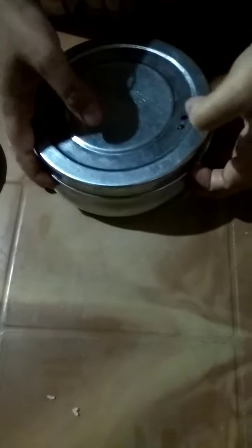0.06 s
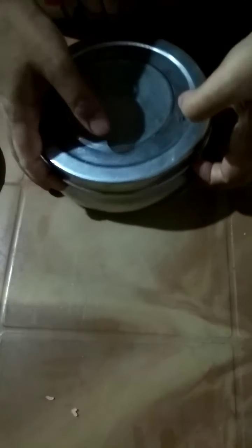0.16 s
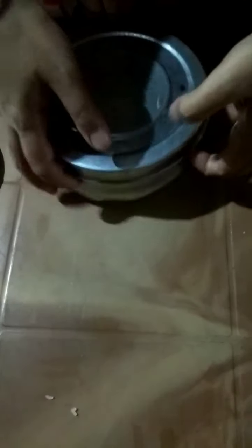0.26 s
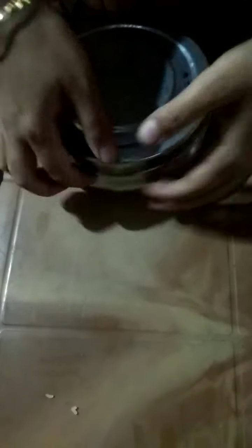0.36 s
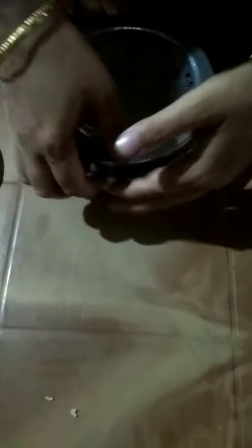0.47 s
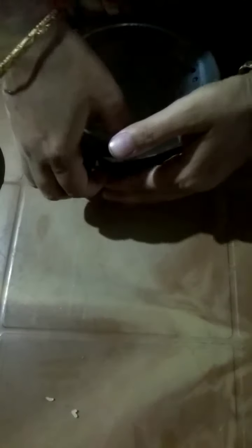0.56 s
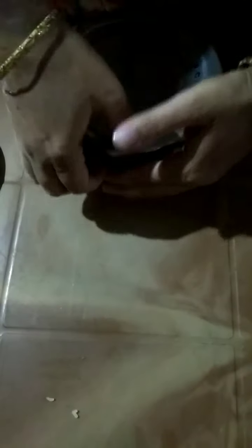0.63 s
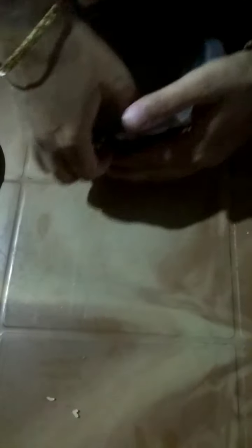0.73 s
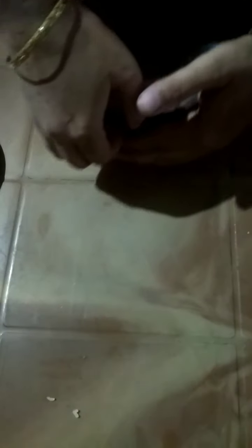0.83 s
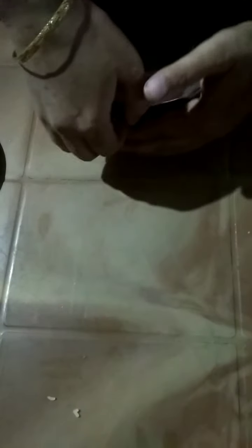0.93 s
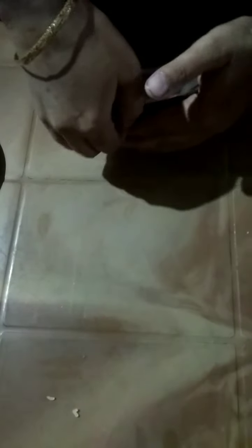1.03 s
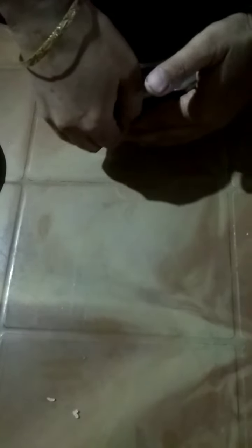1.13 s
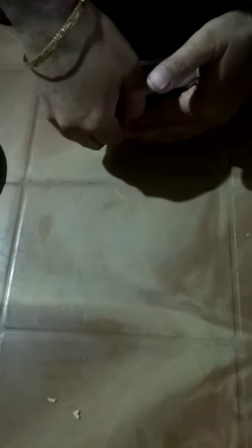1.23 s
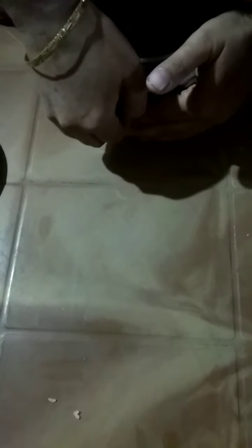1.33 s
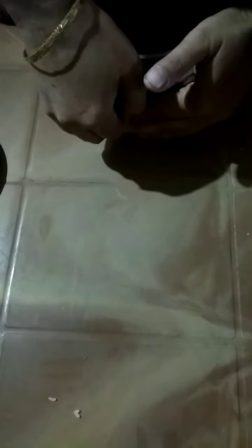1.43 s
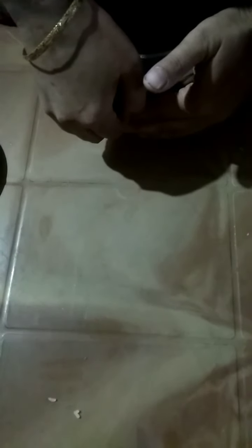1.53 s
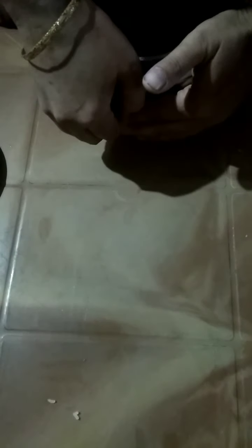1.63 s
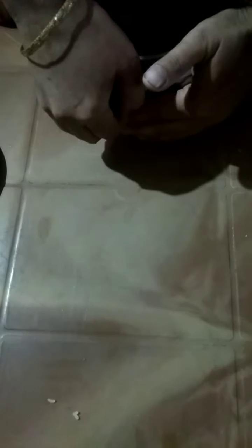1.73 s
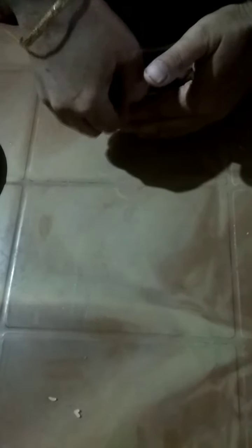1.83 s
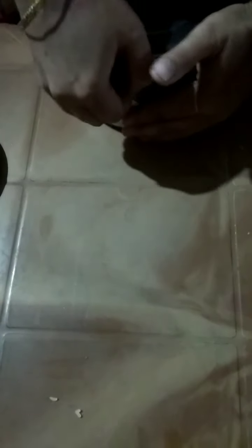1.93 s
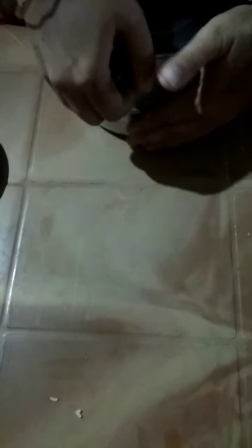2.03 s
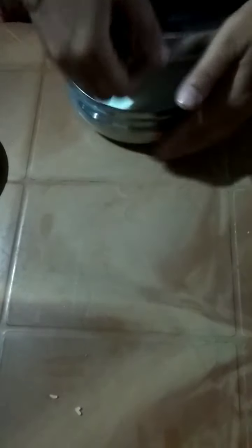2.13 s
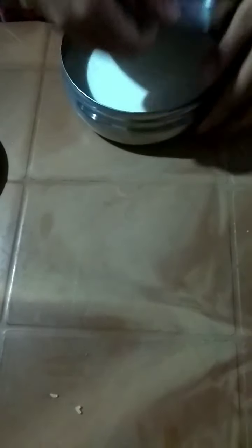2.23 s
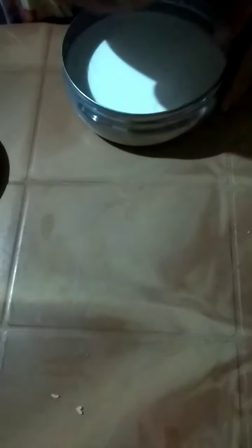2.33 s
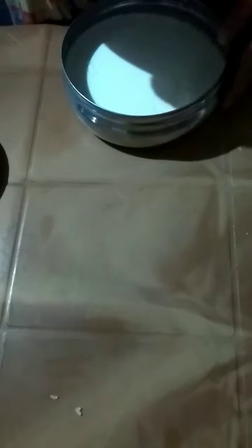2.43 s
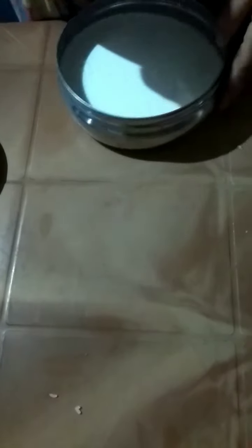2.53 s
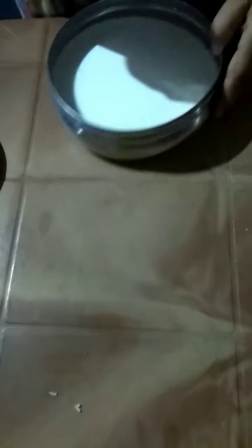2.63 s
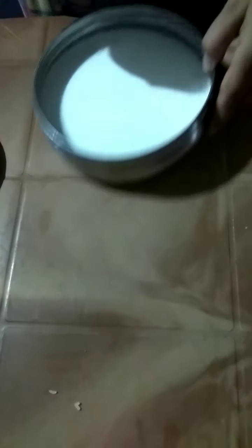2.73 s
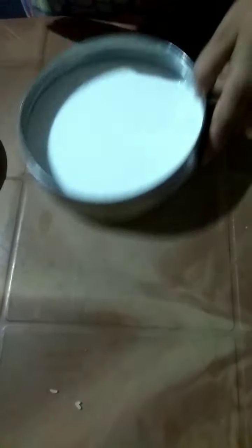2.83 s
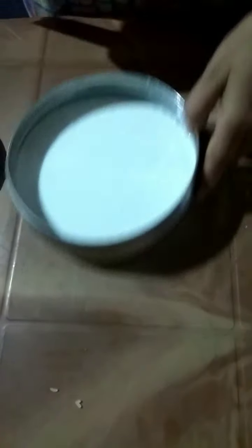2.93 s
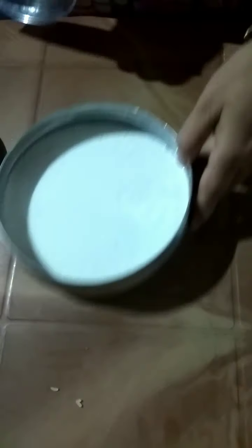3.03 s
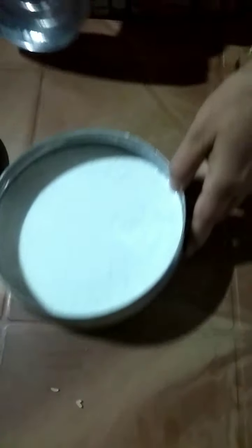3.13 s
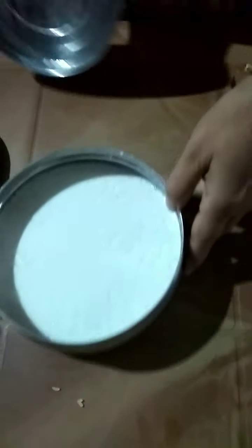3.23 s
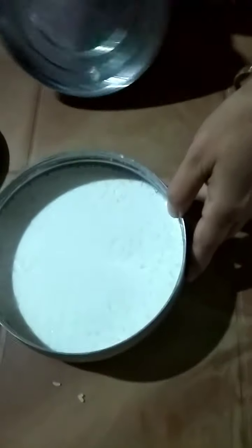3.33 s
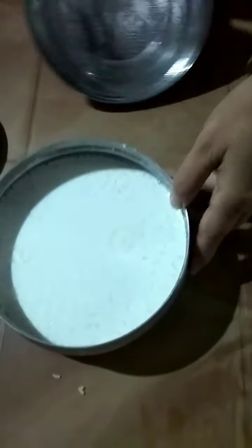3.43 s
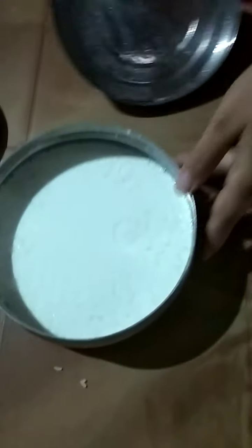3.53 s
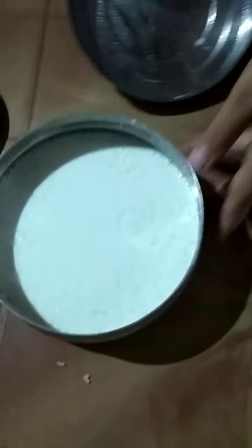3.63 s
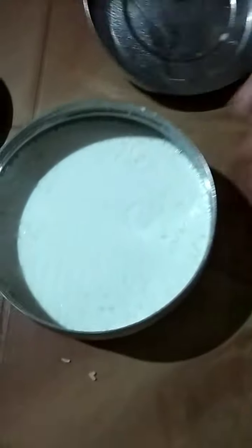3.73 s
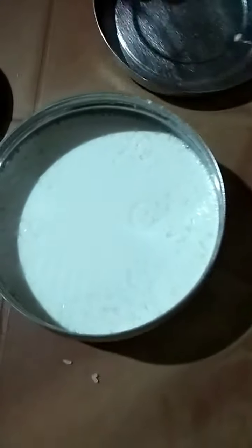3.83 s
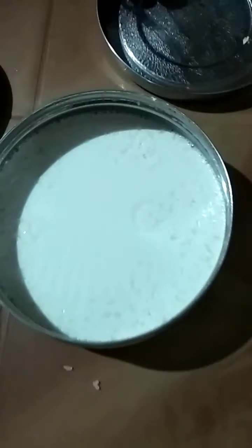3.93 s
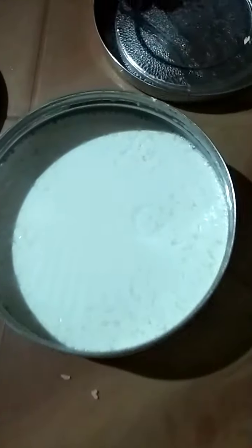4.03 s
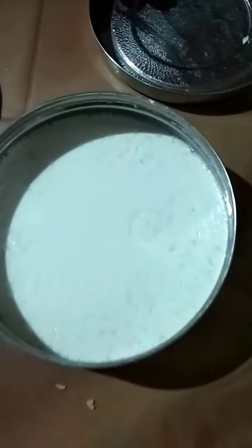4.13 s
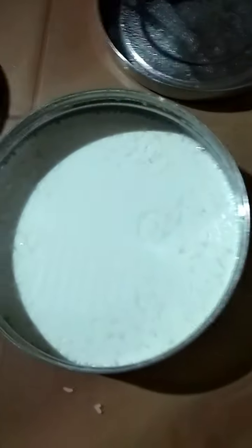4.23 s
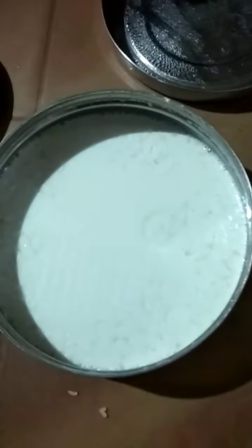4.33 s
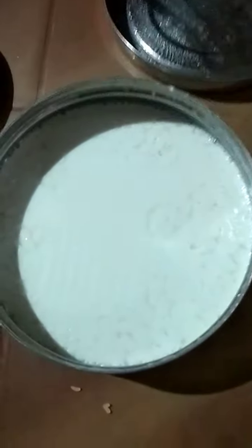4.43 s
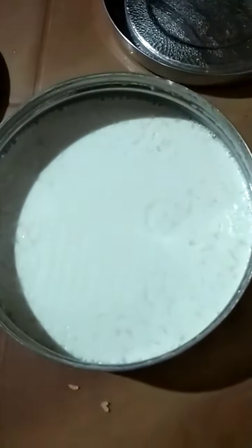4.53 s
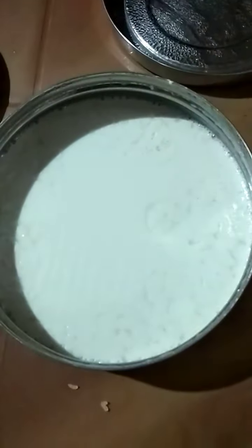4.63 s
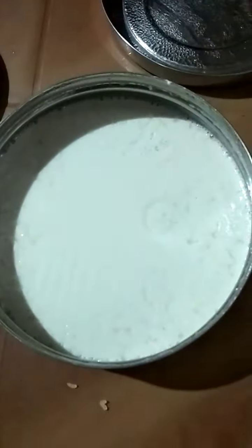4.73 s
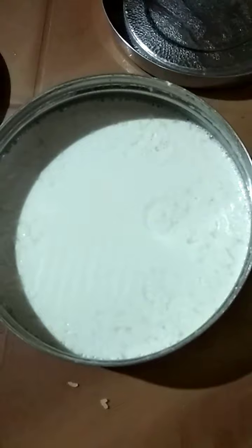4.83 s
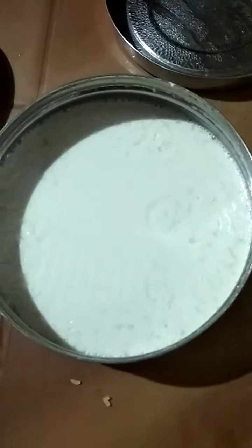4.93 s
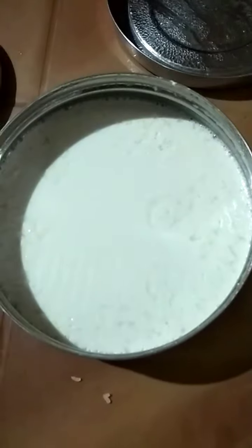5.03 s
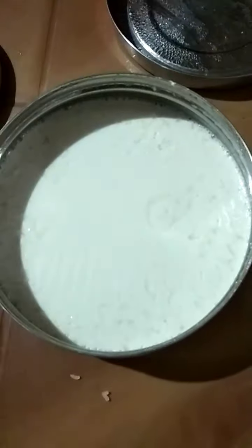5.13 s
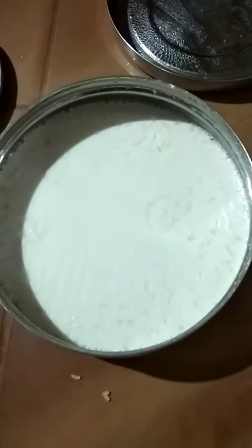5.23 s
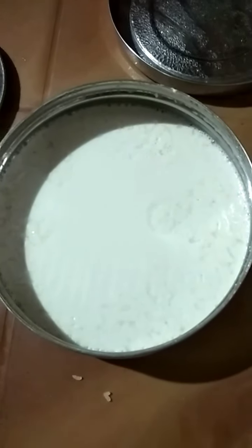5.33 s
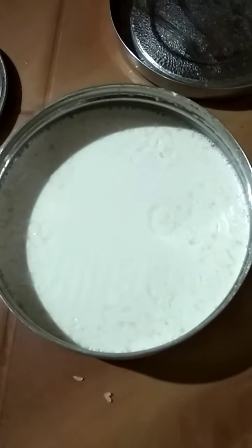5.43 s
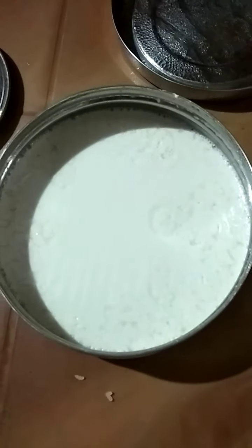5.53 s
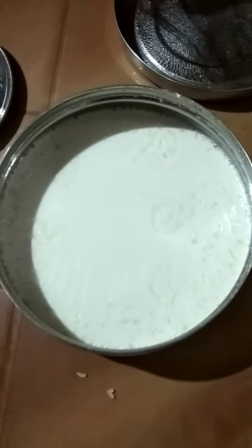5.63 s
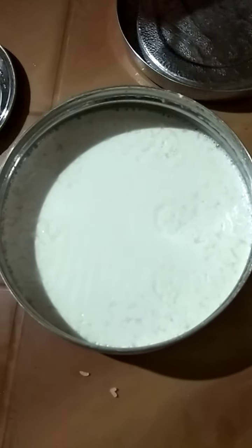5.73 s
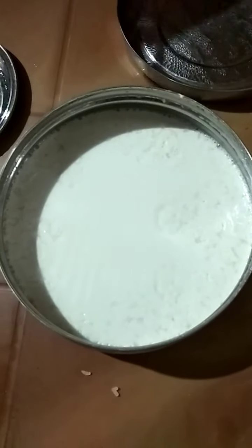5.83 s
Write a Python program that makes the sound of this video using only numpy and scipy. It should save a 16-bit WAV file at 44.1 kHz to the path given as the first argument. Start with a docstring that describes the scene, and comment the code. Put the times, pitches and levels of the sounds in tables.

```python
"""A steady hiss over a low house rumble, then dull bumps: a round steel food tin on a tiled kitchen floor.
The phone's two microphones are close. Fingers and palm rub shaped noise; pushes set the hollow tin booming.
The lid snaps free as a short stick-slip scrape and rings in many decaying steel modes; the tin is shoved,
the lid is put down and rattles to rest, and a bangle clinks twice in beating modes.
A small hard room answers the knocks and scrapes with a short tail of decaying noise."""
import sys
import numpy as np
from scipy import signal
from scipy.fft import rfft, irfft, next_fast_len
from scipy.io import wavfile
from scipy.ndimage import uniform_filter1d, map_coordinates

SR = 44100
rng = np.random.default_rng(int(sys.argv[2]) if len(sys.argv) > 2 else 0)


def master(y):
    """Save y as 16-bit WAV."""
    cut = np.clip(np.atleast_2d(y).T, -1, 1)
    pcm = np.round(cut * 32767)  # scale
    wavfile.write(sys.argv[1], SR, pcm.astype(np.int16))


N = 259562  # length of the scene in samples
T = np.arange(SR // 2) / SR  # seconds since a blow

# Likeness of the left and right microphones. Each row: frequency in Hz, likeness from 0 to 1.
MIC_LIKENESS = [(200, 0.97), (350, 0.92), (600, 0.17), (1000, 0), (16000, 0.042)]
# Decay of the tiled room. Each row: frequency in Hz, t60 in seconds.
ROOM_DECAY = [(150, 0.38), (1000, 0.36), (3000, 0.52), (8000, 0.41), (15000, 0.28)]
TOP_HZ = 15900  # band limit of the phone

# Hiss at the microphones. Each row: frequency in Hz, relative level in dB per Hz.
HISS_SPECTRUM = [(500, -28), (1500, -11.5), (3000, -12), (4300, -12.5), (5300, -0.5), (6900, 3),
                 (8700, -3.5), (10400, 6), (12200, -6), (14000, 1.5), (15300, -15), (16000, -1)]
# Low rumble of the house. Each row: frequency in Hz, relative level in dB per Hz.
RUMBLE_SPECTRUM = [(12, -8), (24, 11.5), (50, -10), (90, -4.5), (140, -18), (205, -7), (400, -22),
                   (900, -22.5), (2000, -54), (5000, -25.5)]
WHISTLE_DB = -69  # a thin whistle in the hiss

# The tin is shoved over the tile. Each row: start in seconds, hold in seconds, level in dB.
TIN_DRAGS = [(.15, 0.12, -57), (.35, 1, -63), (1.91, 0.027, -37.5), (2.15, 0.17, -48.5),
             (2.555, 0.023, -48.5), (2.83, 0.1, -47.5), (2.99, 0.38, -52.5), (3.64, 0.25, -59),
             (4.115, 0.008, -52)]
DRAG_ATTACK_S, DRAG_RELEASE_S = 0.037, 0.022  # time constants of a shove
# Steel grinding over tile. Each row: frequency in Hz, relative level in dB per Hz.
GRIND_SPECTRUM = [(25, 12), (60, 0.5), (110, -4), (150, 4.5), (220, -7), (330, -1.5), (480, -8.5),
                  (900, -8), (2000, -16.5), (4000, -25), (15000, -31.5)]
# A shoved tin sticks and slips: mean slips a second, level beside the grinding.
JUDDER_PER_S, JUDDER_DB = 64, -2
# The tin's base scuffs the tile.
# Each row: centre in seconds, level in dB, half-length in seconds, brightness in dB per octave.
BASE_SCUFFS = [(0.207, -48.5, 0.034, 2.5), (2.615, -35, 0.0081, -3), (2.885, -41.5, 0.031, -11),
               (3.036, -39.5, 0.012, 4), (3.186, -67, 0.061, -8.5)]
# Steel scuffing on tile. Each row: frequency in Hz, relative level in dB per Hz.
SCUFF_SPECTRUM = [(150, 1.5), (330, 2), (550, 1.5), (850, -3), (1500, -11.5), (2800, -17), (15000, -22)]
UNEVENNESS_DB, UNEVENNESS_PER_S = 0, 260  # scuff unevenness, 0 for even; its random knots a second
# Fingers slide over the steel. Each row: start in seconds, hold in seconds, level in dB.
FINGER_RUBS = [(.28, 0.044, -50), (.77, 0.16, -50), (1.125, 0.02, -51), (1.92, 0.0099, -45.5),
               (2.19, 0.049, -38), (2.66, 0.19, -47), (2.92, 0.17, -46.5), (3.1, 0.17, -49),
               (3.6, 0.29, -60)]
RUB_ATTACK_S, RUB_RELEASE_S = 0.028, 0.045  # time constants of a finger stroke
# Fingertips on steel. Each row: frequency in Hz, relative level in dB per Hz.
SKIN_SPECTRUM = [(300, -4), (550, 7.5), (1000, 1.5), (2500, 3), (4500, 4), (8000, 4), (12000, 10.5),
                 (15500, -3)]
SCRATCH_DB = -21.5  # the part of a finger stroke that drums on the hollow tin

# Soft blows of the tin on fingers and floor.
# Each row: time in seconds, push in dB, push half-width in seconds, boom against the push in dB.
TIN_BUMPS = [(.160, -24, 0.0015, -10), (.169, -44, 0.00062, -29), (.189, -48, 0.0014, -13),
             (.198, -40.5, 0.0014, -16), (.224, -56, 0.0016, -1), (.357, -48, .0005, -14),
             (.637, -40, 0.0006, -14), (.915, -47, 0.0003, -22), (1.471, -32.5, 0.0011, -14),
             (1.537, -34.5, 0.00091, -26), (1.582, -29, 0.0012, -14.5), (1.687, -28, 0.0012, -10),
             (1.717, -41.5, 0.0016, -7), (1.785, -32.5, 0.00096, -10.5), (1.96, -39, 0.014, -5),
             (2.187, -22.5, 0.00065, -13), (2.553, -49, 0.00067, -6), (2.612, -39, 0.0006, -8),
             (2.642, -43, 0.0016, -2.5), (2.877, -42, 0.0021, -5), (2.913, -33, 0.0014, -11.5),
             (3.047, -29.5, 0.0025, -11.5), (3.086, -32.5, 0.0024, -20), (3.296, -36, 0.0017, -12),
             (4.107, -33, 0.00059, -17), (4.117, -36.5, 0.00061, -19), (4.913, -39.5, 0.0009, -14)]
# The hollow tin on the floor. Each row: frequency in Hz, level in dB, t60 in seconds before other damping.
HOLLOW_TIN = [(145.4, 0, 0.48), (176.2, -2.5, 0.24), (267.5, -2.5, 0.07), (320.5, 3.5, 0.12),
              (1803, -25.5, 0.32)]
# Steel clattering under a blow. Each row: frequency in Hz, relative level in dB per Hz.
CLATTER_SPECTRUM = [(150, -6), (330, 0.5), (450, -12), (600, 3), (900, -1), (1500, -8.5), (2800, -17.5),
                    (4500, -16), (15000, -22.5)]
TIN_CLATTER_DB, LID_CLATTER_DB = -20, -9.5  # clatter under a push of 1 ms half-width
HARDNESS_DB = 9.5  # more clatter for each halving of the contact time

# The tight lid or the base jerks under the grip. Each row: time in seconds, level in dB.
GRIP_SLIPS = [(0.185, -43.5), (0.201, -37.5), (0.211, -47), (0.229, -47.5), (1.137, -52), (1.472, -53.5),
              (1.585, -54), (1.688, -51.5), (1.875, -51), (3.09, -42.5), (3.255, -47.5)]
# Steel damped by the hands. Each row: frequency in Hz, level in dB, t60 in seconds.
GRIPPED_STEEL = [(1115, -0.5, 0.02), (1270, -12.5, 0.053), (2230, -10.5, 0.066), (2430, -15.5, 0.066),
                 (4020, -14, 0.027)]

# The palm drags dully round the lid's wall. Each row: start in seconds, hold in seconds, level in dB.
PALM_TWISTS = [(.33, .13, -60.5), (.58, .025, -59.5), (.69, 0.048, -55.5), (.8, 0.15, -63),
               (1.11, .09, -59), (1.27, 0.19, -64), (1.69, 0.14, -65.5), (1.86, 0.088, -54.5),
               (2.04, 0.049, -60), (2.72, .06, -54.5)]
# Palm on steel. Each row: frequency in Hz, relative level in dB per Hz.
PALM_SPECTRUM = [(200, -4.5), (600, 8.5), (1200, -3), (2400, -2.5), (3600, -8), (6000, -9.5),
                 (15000, -24.5)]
PALM_CATCH_DB, PALM_CATCH_PER_S = 2.5, 70  # how hard and how often the skin catches

# The lid's rim catches the tin. Each row: start in seconds, level in dB, scrape length in seconds,
# ring in dB, brightness in dB per octave, rim resonance in Hz, its half-width in Hz, its lift in dB.
LID_SNAPS = [(2.1854, -14, 0.0099, -7.5, 0, 3590, 230, 21.5),
             (2.371, -33, 0.012, -14.5, 3.5, 2650, 800, 18)]
# The rim's scrape before its resonance. Each row: frequency in Hz, relative level in dB per Hz.
RIM_SPECTRUM = [(120, -9), (320, 1), (1000, -6.5), (2300, -7), (2900, -9), (4200, -7), (4700, 3),
                (5400, -26), (6150, 1.5), (6750, -26.5), (7250, 1.5), (7700, -9.5), (10000, -9.5),
                (11200, -0.5), (12900, -7.5), (14200, -11), (15500, -12.5)]
# Steel of tin and lid as they part. Each row: frequency in Hz, level in dB, t60 in seconds before the grip.
PARTING_STEEL = [(238, -6, 0.35), (322, 13, .085), (480, -2, .2), (754, 7, 0.2), (781, -4, .33),
                 (862, -1.5, 0.3), (894, -2, .35), (1019, 6, 0.46), (1027, -3, .55), (1252, -2.5, 0.42),
                 (1428, -3.5, 0.35), (1540, -7, .35), (1550, 2, 0.44), (1785, -3, 0.35), (1992, -7, .5),
                 (2089, -6, 0.45), (2183, -5, .36), (2260, -9, .3), (2385, -11, .5), (2503, -6, .35),
                 (2573, -4, 0.48), (2783, -9, .45), (2912, -6, 0.5), (2966, -4, .4), (3133, -5, 0.45),
                 (3273, -7, .28), (3431, 4, .15), (3523, 12, .045), (3628, -6, 0.22), (3817, 4, .12),
                 (4059, -7, .31), (4409, -5, .22), (4619, -8, 0.35), (6158, -5, .28), (6627, -4, .18),
                 (7250, -4, .13), (8592, -2, .14), (8807, -8, .33), (9505, -5, 0.3), (11350, -5, .16),
                 (12640, -7, .21)]
# A crowd of weak steel overtones. Each row: frequency in Hz, relative level of each overtone in dB.
SHIMMER_LEVELS = [(300, -16), (450, -4), (900, -2), (1680, -4), (2200, 2), (3500, -8), (5000, 3.5),
                  (8000, 3), (11500, 5), (15500, -10.5)]
# Decay of those overtones. Each row: frequency in Hz, t60 in seconds before any grip.
SHIMMER_DECAY = [(300, 0.58), (1200, 0.68), (3000, 0.87), (6000, 0.14), (11000, 0.28), (15000, 0.38)]

# The open tin's edge taps the tile. Each row: start in seconds, level in dB, scrape length in seconds,
# ring in dB, brightness in dB per octave, rim resonance in Hz, its half-width in Hz, its lift in dB.
EDGE_TAPS = [(2.6275, -30.5, 0.012, -9, 4.5, 3780, 332, 13.5), (3.03, -37, 0.0043, -21, 5.8, 1280, 501, 31)]
# Steel of the open tin. Each row: frequency in Hz, level in dB, t60 in seconds before the grip.
OPEN_TIN_STEEL = [(624, 0, .33), (992, 1, .35), (1007, 5.5, 0.42), (1535, 0, 0.33), (1968, 5, 0.3),
                  (1992, 3, 0.33), (2455, -2, .16), (3262, -5, 0.3), (3644, 0, .16), (3850, 0, 0.13),
                  (4050, 4, 0.2), (4680, 0, 0.11), (4947, -2, 0.25), (7585, 5, .08), (14340, 4, .1)]

# The lid lands flat on the tiles.
# Each row: time in seconds, push in dB, push half-width in seconds, boom against the push in dB.
LID_LANDING = [(3.5157, -24.5, 0.00078, -7.5)]
# The lid rocks and touches down again.
# Each row: time in seconds, push in dB, push half-width in seconds, boom against the push in dB.
LID_TOUCHES = [(3.547, -46, 0.00025, -5), (3.593, -48.5, 0.00038, 10), (3.644, -37, 0.00079, -1.5),
               (3.69, -49.5, 0.001, 1.5), (3.72, -41.5, 0.00084, -9), (3.79, -59, 0.00073, 8)]
# The loose lid. Each row: frequency in Hz, level in dB, t60 in seconds.
LID_STEEL = [(280, -3.5, 0.38), (300.5, -5, 0.32), (657, -16, 0.52), (834, -17, 0.48), (1010, -9, 0.25),
             (1443, -13.5, 0.45), (1760, -24, 0.55), (2358, -20, 0.48), (2568, -24, .64), (2837, -20, 0.75),
             (2862, -25, .6), (3004, -23, 0.65), (3338, -20, .3)]
# Air trapped under the flat lid. Each row: frequency in Hz, level in dB, t60 in seconds.
TRAPPED_AIR = [(137.3, 5.5, 0.31), (319, 2, .09)]
LID_SHIMMER_DB, LID_SHIMMER_TILT_DB = -47, -2  # the landing lid's overtones: level, dB per octave
RATTLE_DB, RATTLE_S, RATTLE_TILT_DB = -46, 0.07, 0.5  # settling rattle: level, time constant, dB per octave
RATTLE_HZ, RATTLE_DEPTH_DB = 29, 3.5  # how fast and how hard the lid rocks

# A grazing, then a full contact of the bangle. Each row: start in seconds, level in dB, tick in dB.
BANGLE_CLINKS = [(4.819, -37.5, 3), (4.9112, -37, 3.5)]
# The bangle's modes.
# Each row: frequency in Hz, t60 in seconds before the wrist, level when grazed in dB, when struck in dB.
BANGLE_MODES = [(2418, .75, -4, -26), (2606, 0.68, -17, -0.5), (2613.2, 0.68, -30, -3.5),
                (4650, 0.33, -28, -2.5), (5819, .22, -26, -6), (5922, .3, -20, 2), (6837, 0.25, -17, 2),
                (8140, 0.2, -26, 1), (8161, .32, -28, -3), (9798, .14, -18, -1), (10500, .15, -5, -18),
                (10990, .19, -22, -7), (11180, 0.3, -20, 1), (11630, .26, -5, 4), (11795, 0.25, 6, -3),
                (12090, 0.2, -22, 4)]
# The bangle's contact. Each row: frequency in Hz, relative level in dB per Hz.
TICK_SPECTRUM = [(200, -12), (950, 1.5), (1600, -9.5), (3000, 0), (4200, -16), (6000, 1.5), (8000, -5),
                 (10300, 7.5), (12500, -2.5), (15500, -7)]


def amp(db):
    """Decibels to gain."""
    return 10 ** (np.asarray(db) / 20)


def unit(x):
    """Scaled to rms 1."""
    return x / np.sqrt(np.mean(x ** 2) + 1e-20)


def along(points, hz):
    """(Hz, value) points read on a log frequency axis."""
    f, v = np.transpose(points)
    return np.interp(np.log(hz + 1), np.log(f + 1), v)


def wobble(rate):
    """A smooth random curve through rate knots a second."""
    knots = rng.standard_normal(int(N * rate / SR) + 4)
    return map_coordinates(knots, [np.arange(N) * rate / SR])


def add(track, s, sound):
    """Mix a sound into the track at time s."""
    start = round(s * SR)
    track[:, start:start + sound.shape[-1]] += sound[..., :N - start]


def noise(spectrum, size, tilt_db=0):
    """Stereo noise of rms 1: the microphones share the bass, and hardly any of the treble."""
    padded = next_fast_len(size, True)
    hz = np.fft.rfftfreq(padded, 1 / SR)
    turn = np.arccos(np.clip(along(MIC_LIKENESS, hz), -1, 1)) / 2
    gain = amp(along(spectrum, hz) + tilt_db * np.log2(1 + hz / 1000))
    white = rfft(rng.standard_normal((2, padded)))
    mid, side = irfft(white * gain * [np.cos(turn), np.sin(turn)], padded)[:, :size]
    return unit(np.array([mid + side, mid - side]))


def ring(modes, scatter_db):
    """Decaying modes at chance strengths; short waves reach the right microphone earlier in phase."""
    out = np.zeros((2, len(T)))
    for hz, db, t60 in modes:
        phase = np.arccos(np.clip(along(MIC_LIKENESS, hz), -1, 1)) * np.array([[-.5], [.5]])
        level_db = db + scatter_db * rng.standard_normal((2, 1)) - 60 * T / t60
        out += amp(level_db) * np.sin(2 * np.pi * hz * T + phase)
    return out


def fade(sound, decay):
    """Each frequency dies away at its own (Hz, t60 in seconds)."""
    hz, t, z = signal.stft(sound, SR, nperseg=256)
    faded = z * amp(-60 * t / along(decay, hz)[:, None])
    return signal.istft(faded, SR, nperseg=256)[1][:, :sound.shape[1]]


def reverb(sound, wet_db):
    """A sound plus its own fresh tail from the tiled room, as decaying noise."""
    tail = fade(noise([(100, 0), (16000, 0)], size=len(T)), ROOM_DECAY)
    tail = tail * (1 - np.exp(-T / 0.0041))
    wet = signal.fftconvolve(sound, tail / np.linalg.norm(tail[0]), axes=1)[:, :sound.shape[1]]
    return sound + amp(wet_db) * wet


def strokes(rows, attack_s, release_s):
    """Each stroke swells, holds its level and dies away; overlapping strokes add in power."""
    t = np.arange(N) / SR
    power = np.zeros(N)
    for s, hold, db in rows:
        swell = np.minimum(t - s, 0) / attack_s
        decay = np.maximum(t - s - hold, 0) / release_s
        power += (amp(db) * np.exp(swell - decay)) ** 2
    return np.sqrt(power)


def patchy(sound, depth_db):
    """Narrow bands of the noise swell and sink at random."""
    z = signal.stft(sound, nperseg=1024)[2]
    field = uniform_filter1d(rng.standard_normal(z.shape[1:]), size=2, axis=0)
    field = uniform_filter1d(field, size=7, axis=1)
    return unit(signal.istft(z * amp(depth_db * unit(field)), nperseg=1024)[1][:, :N])


def overtones(pitches, tilt_db):
    """A crowd of weak steel modes, each struck with a chance strength and phase."""
    lines = np.zeros((2, SR // 2 + 1), complex)  # one bin per Hz
    real, imag = rng.standard_normal((2, 2, len(pitches)))
    level_db = along(SHIMMER_LEVELS, pitches) + tilt_db * np.log2(1 + pitches / 1000)
    lines[:, pitches] = (real + 1j * imag) * amp(level_db)
    return fade(unit(irfft(lines, SR))[:, :len(T)], SHIMMER_DECAY)


def blows(rows, modes, clatter_db):
    """A soft blow is one push and recoil, then the body's boom; shorter contact brings more clatter."""
    out = np.zeros((2, N))
    lead = .01  # seconds of push before the blow's centre
    for s, db, width, boom_db in rows:
        u = (T - lead) / width
        push = u * np.exp((1 - u * u) / 2) * np.ones((2, 1))
        boom = ring(modes, scatter_db=-1.0) * (1 - np.exp(-T / 0.0024))
        hard_db = HARDNESS_DB * np.log2(.001 / width)
        clatter = noise(CLATTER_SPECTRUM, size=len(T)) * np.exp(-T / 0.016)
        add(out, s - lead, amp(db) * reverb(push, wet_db=-5.0))
        add(out, s, amp(db + boom_db) * boom)
        add(out, s - width, amp(db + clatter_db + hard_db) * reverb(clatter, wet_db=-3.5))
    return out * amp([[-.5], [.5]])


def background():
    """Microphone hiss with a faint thin whistle, and the low rumble of the house, as shaped noise."""
    hiss = amp(-49.5 + 0.39 * wobble(2.1)) * noise(HISS_SPECTRUM, size=N)
    whistle_band = [(10100, -73.5), (10450, -16), (10600, 8.5), (10700, -13.5), (11000, -99)]  # Hz, dB per Hz
    whistle = amp(WHISTLE_DB) * noise(whistle_band, size=N)
    rumble = amp(-55.5 + 1.1 * wobble(6.6)) * noise(RUMBLE_SPECTRUM, size=N)
    return hiss + whistle + rumble


def judder():
    """Tiny slips at uneven times keep the hollow tin drumming; rms 1."""
    slips = (rng.random(N) < JUDDER_PER_S / SR) * rng.standard_normal(N)
    body = ring(HOLLOW_TIN, scatter_db=-4.0) * np.exp(-T / 0.03)
    return unit(signal.fftconvolve(slips[None], body, axes=1)[:, :N])


def scuffs():
    """The base scuffs the tile: short, smooth swells of noise."""
    out = np.zeros((2, N))
    lead = .25  # seconds from the start of a swell to its centre
    for s, db, length, bright_db in BASE_SCUFFS:
        evenness = unit(amp(UNEVENNESS_DB * wobble(UNEVENNESS_PER_S)[:len(T)]))
        scrape = noise(SCUFF_SPECTRUM, size=len(T), tilt_db=bright_db)
        stroke = np.exp(-((T - lead) / length) ** 2) * evenness * scrape
        start = max(s - lead, 0)
        cut = round((start - s + lead) * SR)  # what would fall before time zero
        add(out, start, amp(db) * reverb(stroke, wet_db=-8)[:, cut:])
    return out


def sliding():
    """Dragging steel grinds, judders and scuffs on the tile, while fingers rub over it in fine grains."""
    shove = strokes(TIN_DRAGS, DRAG_ATTACK_S, DRAG_RELEASE_S)
    rub = strokes(FINGER_RUBS, RUB_ATTACK_S, RUB_RELEASE_S)
    grind = shove * amp(1.4 * wobble(45)) * noise(GRIND_SPECTRUM, size=N)
    drumming = (amp(JUDDER_DB) * shove + amp(SCRATCH_DB) * rub) * judder()
    scuffing = scuffs()
    pressure_db = 1.3 * wobble(30)
    grain = amp(pressure_db + 2.0 * wobble(500))
    fingers = rub * grain * patchy(noise(SKIN_SPECTRUM, size=N), depth_db=1.8)
    return grind + drumming + scuffing + fingers


def bumps():
    """The handled tin knocks on fingers and floor: pushes that set its hollow body booming."""
    return blows(TIN_BUMPS, HOLLOW_TIN, clatter_db=TIN_CLATTER_DB)


def jerks():
    """Held steel gives way in short dry ticks, its modes damped by the hands."""
    out = np.zeros((2, N))
    for s, db in GRIP_SLIPS:
        add(out, s, amp(db) * reverb(ring(GRIPPED_STEEL, scatter_db=0.5), wet_db=-6.0))
    return out


def twisting():
    """The palm catches and lets go as it works the lid round: a rough, dull rub."""
    effort = strokes(PALM_TWISTS, attack_s=.028, release_s=.04)
    catches = unit(amp(PALM_CATCH_DB * wobble(PALM_CATCH_PER_S) + 1.5 * wobble(400)))
    return effort * catches * patchy(noise(PALM_SPECTRUM, size=N), depth_db=2)


def snaps(rows, modes):
    """The rim sticks and slips for a few ms and sets the steel ringing."""
    out = np.zeros((2, N))
    pitches = (rng.uniform(np.sqrt(300), np.sqrt(16000), size=1800) ** 2).astype(int)  # Hz, thinning upwards
    grid = np.arange(100, 16000, 25)  # Hz
    grip = np.exp(-(T / 0.33) ** 3)  # the closing hand stills the ring
    for s, db, length, ring_db, bright_db, rim_hz, width_hz, lift_db in rows:
        colour = along(RIM_SPECTRUM, grid) + lift_db * np.exp(-((grid - rim_hz) / width_hz) ** 4)
        slips = amp(0.61 * np.cos(2 * np.pi * T / 0.0037))  # one slip every 3.7 ms
        burst = (1 - np.exp(-T / 0.00092)) * np.exp(-(T / length) ** 4) * slips
        scrape = noise(np.column_stack([grid, colour]), size=len(T), tilt_db=bright_db)
        scrape = scrape * burst * amp([[-2.5], [2]])  # stronger on the right
        partials = reverb(ring(modes, scatter_db=0.5), wet_db=-12)
        shimmer = reverb(overtones(pitches, tilt_db=bright_db), wet_db=-5.5)
        steel = (amp(-10.0) * partials + amp(-2.0) * shimmer) * grip
        add(out, s, amp(db) * (reverb(scrape, wet_db=-17) + amp(ring_db) * steel * amp([[-1], [1]])))
    return out


def lid_landing():
    """The lid lands over trapped air, rocks and touches down again, and its overtones ring on."""
    out = blows(LID_LANDING, TRAPPED_AIR + LID_STEEL, clatter_db=LID_CLATTER_DB)
    out += blows(LID_TOUCHES, LID_STEEL, clatter_db=LID_CLATTER_DB)
    pitches = rng.integers(600, 4000, size=220)  # Hz
    add(out, LID_LANDING[0][0], amp(LID_SHIMMER_DB) * overtones(pitches, tilt_db=LID_SHIMMER_TILT_DB))
    return out


def settling():
    """The lid rocks on its rim after landing and rattles to rest: noise pulsing as it dies away."""
    out = np.zeros((2, N))
    rocking = amp(RATTLE_DEPTH_DB * np.cos(2 * np.pi * RATTLE_HZ * T))
    rattle = noise(CLATTER_SPECTRUM, size=len(T), tilt_db=RATTLE_TILT_DB) * rocking * np.exp(-T / RATTLE_S)
    add(out, LID_LANDING[0][0], amp(RATTLE_DB) * rattle)
    return out


def bangle():
    """Each contact point favours its own modes; the hoop is not quite round, so its lowest pair beats slowly."""
    out = np.zeros((2, N))
    skin = np.exp(-(T / 0.37) ** 4)  # the wrist stills the hoop
    for k, (s, db, tick_db) in enumerate(BANGLE_CLINKS):
        modes = [(hz, levels[k], t60) for hz, t60, *levels in BANGLE_MODES]
        flutter = 1 + 0.24 * wobble(416)[:len(T)] * np.exp(-T / 0.14)  # fast, random in level, dying away
        tick = noise(TICK_SPECTRUM, size=len(T)) * np.exp(-T / 0.0065)
        onset = 1 - np.exp(-T / 0.002)
        metal = ring(modes, scatter_db=-1.5) * flutter * onset * amp([[.7], [-.7]])  # a little to the left
        add(out, s, amp(db) * (metal * skin + amp(tick_db) * reverb(tick, wet_db=-2.5)))
    return out


def scene():
    """Everything in the kitchen."""
    opening = snaps(LID_SNAPS, PARTING_STEEL) + snaps(EDGE_TAPS, OPEN_TIN_STEEL)
    knocks = bumps() + lid_landing() + jerks() + settling() + bangle()
    rubbing = sliding() + twisting()
    return opening + knocks + rubbing + background()


def record(dry):
    """The phone keeps nothing above its band limit."""
    size = next_fast_len(N + SR // 2, True)
    kept = np.fft.rfftfreq(size, 1 / SR) < TOP_HZ
    return irfft(rfft(dry, size) * kept, size)[:, :N]


dry = scene()
out = record(dry)
master(out)
```